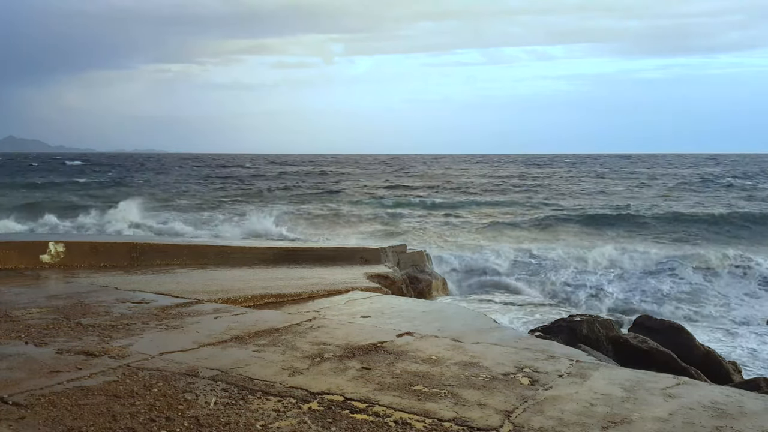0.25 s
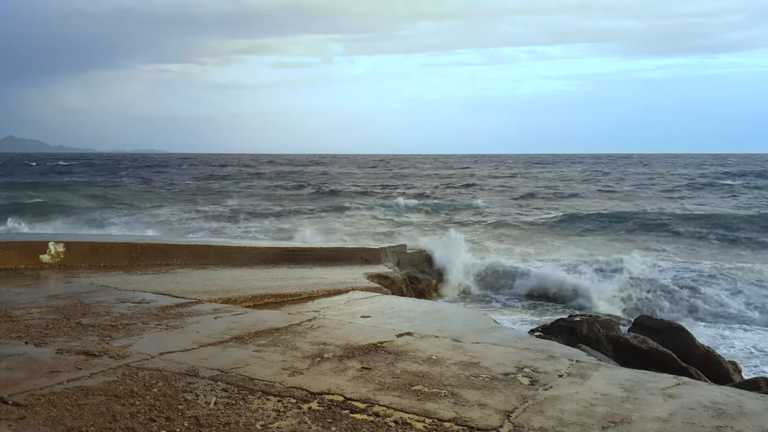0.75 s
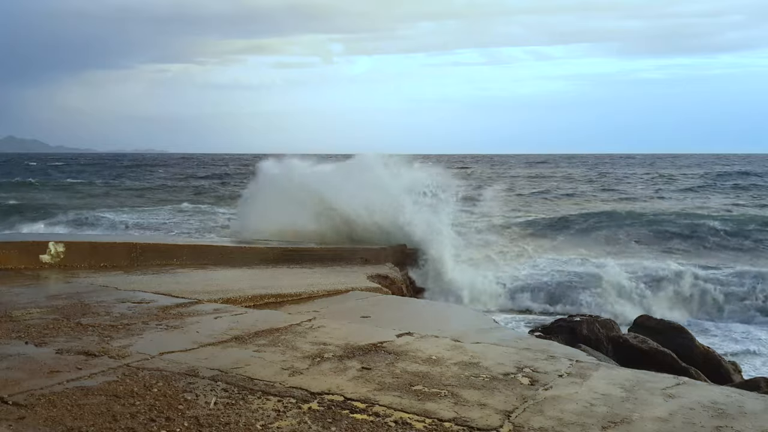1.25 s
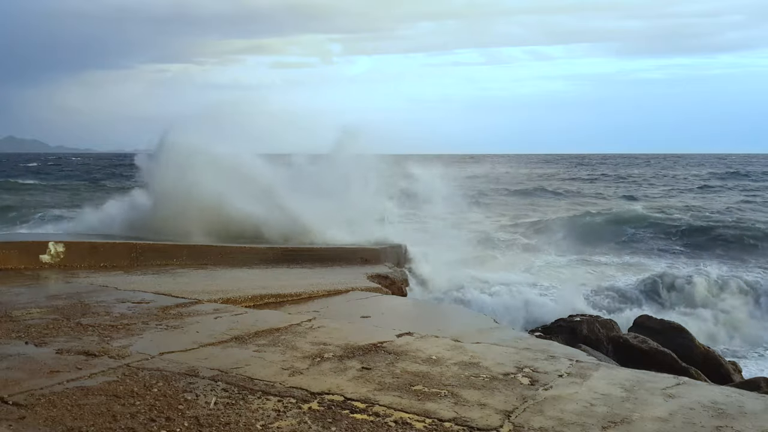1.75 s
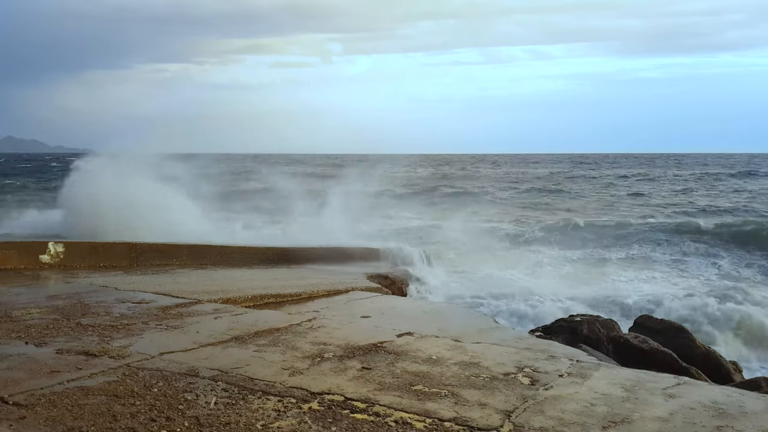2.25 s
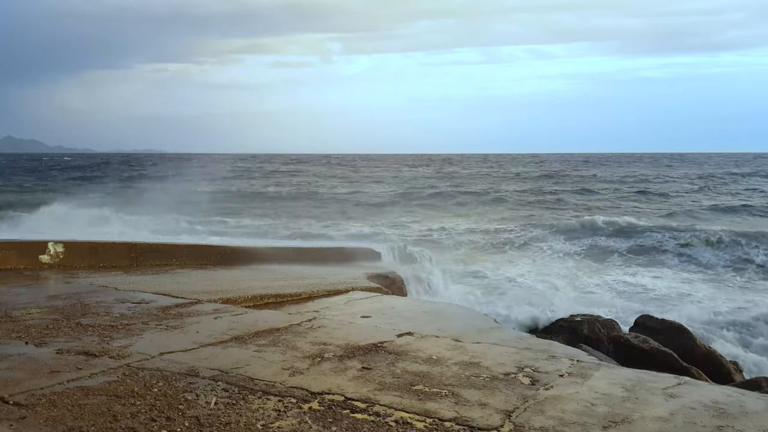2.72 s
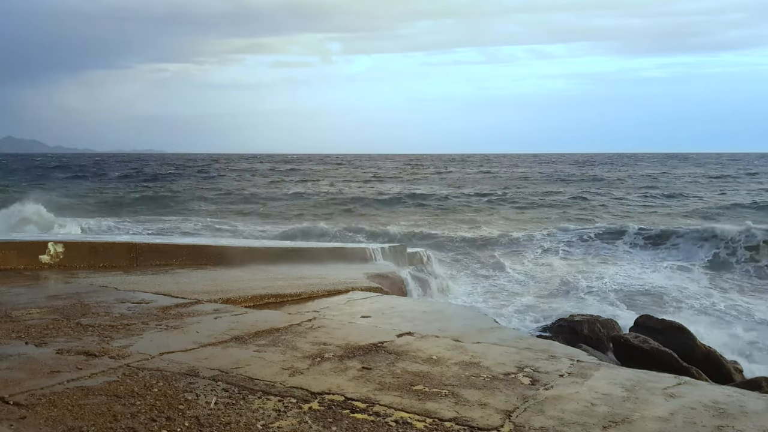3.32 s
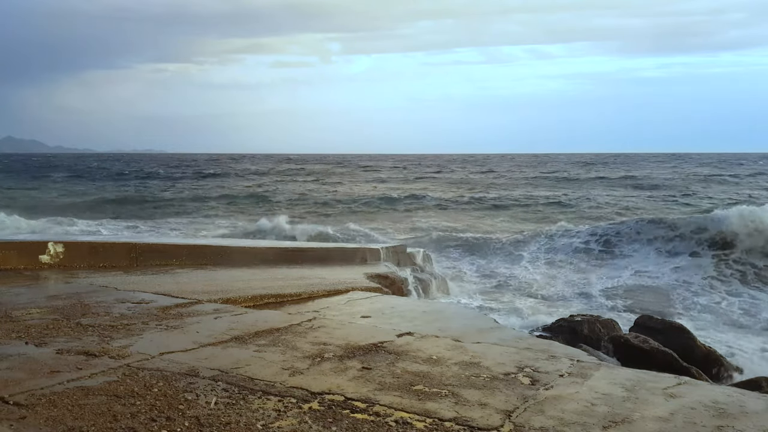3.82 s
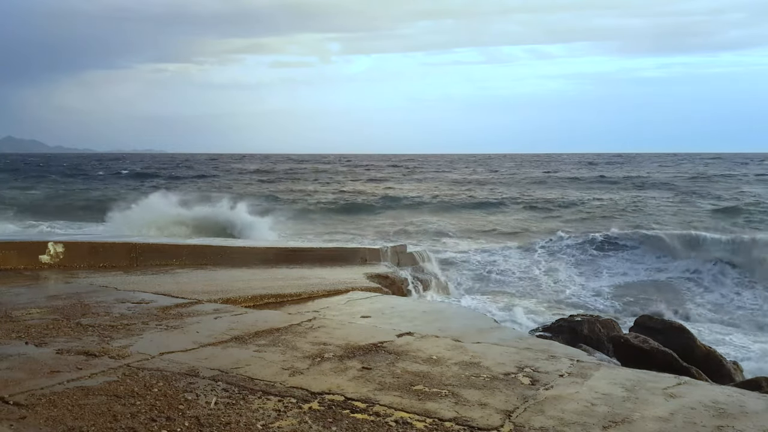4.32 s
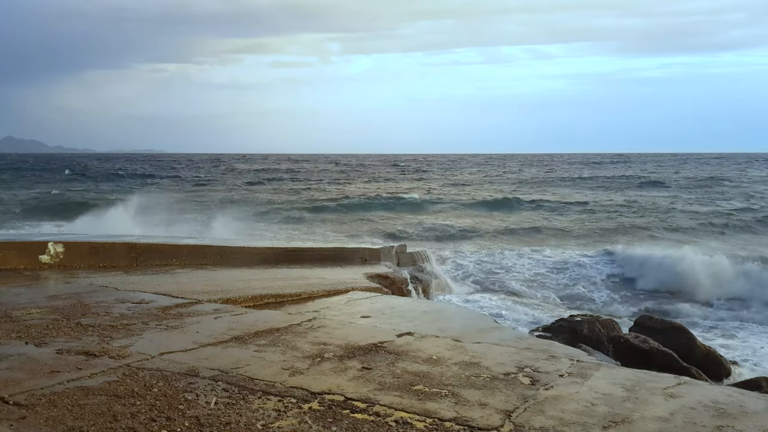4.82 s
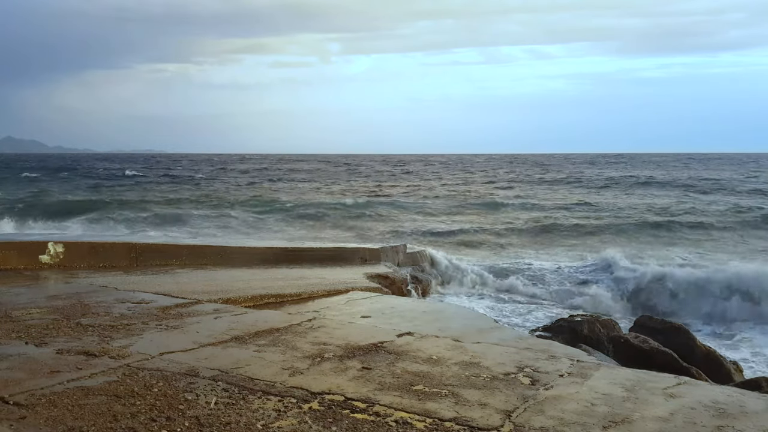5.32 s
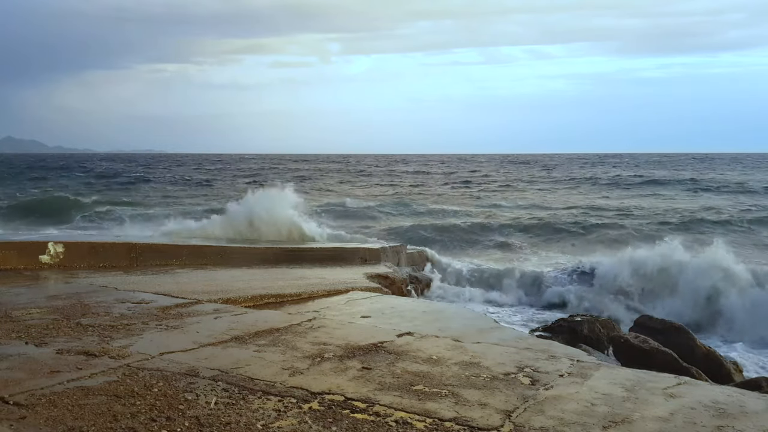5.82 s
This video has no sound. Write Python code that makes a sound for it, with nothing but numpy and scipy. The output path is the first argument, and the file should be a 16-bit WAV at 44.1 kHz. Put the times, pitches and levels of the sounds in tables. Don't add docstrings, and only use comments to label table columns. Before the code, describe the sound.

Close stereo microphones in the wind, facing rough sea at a jetty. Continuous wash and hiss of foam; soft fluttering puffs near the start; a sharp wave burst and low boom; then about a third of a second of loud, rapid, hollow wind knocks on both sides. A quieter lull holds a small pop on the left, followed by rock-breaking waves, a few light puffs and a rising last splash.

```python
import sys
import numpy as np
from scipy import signal
from scipy.fft import rfft, irfft, next_fast_len
from scipy.io import wavfile
from scipy.ndimage import uniform_filter1d, map_coordinates

SR = 44100
rng = np.random.default_rng(int(sys.argv[2]) if len(sys.argv) > 2 else 0)


def invert_db(level):
    return 10 ** (np.asarray(level, dtype=float) / 20)


def generate_wav(signal):
    frames = np.transpose(np.atleast_2d(signal))
    scaled = np.clip(frames, -1, 1) * 32767
    pcm = np.round(scaled).astype(np.int16)
    wavfile.write(sys.argv[1], SR, pcm)


N = 267246

# start_s, surge_db, spray_thrown_db
SEA_SURGE = [(0, -51, -13.5), (.47, -54.5, -14), (.62, -48, -14), (1.1, -46, -12.5), (1.66, -44, -15),
             (1.78, -40, -12), (2.04, -41, -11), (2.16, -38.5, -10.5), (2.5, -42.5, -10.5),
             (2.72, -49.5, -6), (3.3, -50.5, -11), (3.62, -50, -13), (4.24, -42.5, -13.5),
             (4.45, -43.5, -12.5), (4.6, -44, -15.5), (5.21, -39.5, -12), (5.45, -44.5, -14),
             (6.06, -40.5, -11)]
# centre_s, over_surge_db, length_s
SLAPS_AND_LULLS = [(0.59, 2.5, 0.025), (1.127, 4.5, 0.012), (1.09, -1.5, 0.012), (1.676, 2, 0.04),
                   (5.78, -2, 0.061), (1.287, 2, 0.01), (2.118, 2.5, 0.03), (2.683, -5.5, 0.014),
                   (2.994, 1.5, 0.057), (3.064, -4, 0.0082), (3.833, 4, 0.11), (4.01, -4.5, 0.32),
                   (0.253, 1, 0.1), (5.599, 1, 0.014), (5.63, -3.5, 0.031), (5.696, 1.5, 0.017)]
# freq_hz, level_db_per_hz
ROAR_COLOUR = [(60, -66), (250, -36.5), (480, -11), (700, 1), (900, -2), (1150, 3.5), (1400, 0),
               (1700, 2.5), (2600, -32), (5000, -48), (9000, -120)]
# freq_hz, level_db_per_hz
SPLASH_COLOUR = [(300, -56), (900, -11), (1600, -5.5), (2200, -2), (2700, -3.5), (4100, -1.5), (4800, -4.5),
                 (6200, -16.5), (8000, -30), (14000, -120)]
# freq_hz, level_db_per_hz
SPRAY_COLOUR = [(2000, -60), (4500, 4.5), (6000, 0.5), (8300, -8.5), (10500, -2.5), (13000, -6),
                (15700, -13), (20000, -55)]
# freq_hz, share_0_to_1
PORT_LIKENESS = [(250, .3), (550, .78), (900, .5), (1350, .72), (1900, .3), (2200, .5), (2650, .15),
                 (3100, .55), (4000, .25), (5000, .15), (9000, .08), (11500, .22), (15000, .08)]
# freq_hz, lead_rad
PORT_LEAD = [(0, 0), (350, 0), (700, -.9), (1400, -3.1), (1800, -3.9), (2150, -6.2), (3000, -6.5),
             (3600, -7), (4200, -9.2), (5400, -10.5), (7400, -13), (11200, -14), (15500, -22)]
# freq_hz, left_minus_right_db
PORT_BALANCE = [(60, -1), (150, -2), (380, 1), (950, 0.5), (2380, 0.5), (5980, -1.5), (15000, 0)]
# peak_s, peak_db, left_minus_right_db
PRESSURE_LUMPS = [(0, -90, 2), (.39, -73, -11), (.54, -66, -2), (1.06, -91, -5), (1.18, -69, -3),
                  (1.45, -73, -3), (1.75, -66, 0), (2.09, -63, -4), (2.24, -66, 15), (2.4, -63, -10),
                  (2.52, -52.5, 5), (2.9, -83, -18), (3.2, -99, -6), (3.45, -75, -2), (3.88, -72, 3),
                  (4.3, -73, 4), (4.51, -65, -4), (4.691, -85, -1), (4.84, -69, -6), (5.03, -77, -12),
                  (5.15, -74, -1), (5.38, -63, 3), (5.7, -71, -20), (5.9, -76, -10), (6.05, -74, 3)]
# freq_hz, level_db_per_hz
THUMP_COLOUR = [(20, -58), (60, -53), (120, -28.5), (250, -7.5), (400, -6.5), (600, 0), (1000, -3.5),
                (3000, -120)]
# start_s, peak_db, left_minus_right_db, ring_hz
AIR_PUSHES = [(0.176, -44, 10, 500), (0.333, -36.5, 2, 477), (.405, -41, 0, 444), (0.59, -42, 0, 460),
              (1.048, -53, 22, 388), (1.081, -47, 0, 430), (1.604, -46, 3, 490), (1.952, -49, 0.0, 505),
              (2.059, -40, 7, 464), (2.143, -58, 4, 400), (2.18, -71, -13, 490), (2.228, -35, 7, 422),
              (2.273, -38, 10, 420), (2.343, -32, 2, 476), (2.397, -33, 8, 485), (2.606, -42.5, -2, 378),
              (3.064, -54, -18, 482), (3.515, -50, -3, 390), (4.216, -71, -14, 503), (4.578, -49, -5, 437),
              (5.03, -40, 3, 417), (5.56, -46, 7, 510), (5.869, -44, 3.5, 437)]
# peak_s, peak_db, ring_hz, length_ms
LEFT_EDDIES = [(0.3029, -25.5, 1400, 0.7), (0.3084, -27.5, 1340, 0.8), (0.312, -27.5, 970, 1.0),
               (0.3156, -27.5, 1260, 0.6), (0.3372, -18.0, 860, 2.4), (0.34, -23.5, 1120, 1.2),
               (0.4025, -23.0, 840, 1.6), (0.4136, -26.0, 880, 1.0), (0.4186, -28.0, 1160, 0.9),
               (0.4393, -27.5, 910, 1.0), (0.462, -28.0, 1080, 0.9), (4.5785, -26.5, 1180, 1.1),
               (4.5878, -27.0, 1500, 0.6), (4.608, -27.0, 1050, 0.8), (5.421, -26.0, 1440, 0.7),
               (5.4433, -25.0, 1330, 1.6), (5.4828, -22.0, 1350, 0.7), (5.4894, -22.5, 1200, 1.0),
               (5.492, -24.5, 1200, 1.6), (5.5116, -18.5, 1330, 0.7), (5.5152, -24.0, 1040, 1.8),
               (5.5883, -27.0, 1210, 1.1), (5.5919, -23.5, 1260, 0.7), (5.5938, -23.0, 960, 1.4)]
# peak_s, peak_db, ring_hz, length_ms
RIGHT_EDDIES = [(0.3366, -27.0, 890, 3.0), (0.3448, -33.0, 860, 1.7), (0.3468, -29.0, 830, 1.5),
                (0.3533, -31.5, 970, 1.0), (0.3619, -29.5, 870, 1.2), (0.3655, -31.0, 1030, 1.8),
                (0.3688, -31.0, 990, 1.0), (0.3732, -32.0, 840, 1.5), (0.4009, -27.0, 830, 1.5),
                (0.4076, -29.5, 1020, 0.7), (0.4452, -26.0, 790, 2.4), (0.4603, -31.0, 880, 1.3),
                (0.47, -32.5, 1200, 0.8), (0.4803, -34.0, 940, 2.4), (0.5578, -30.0, 980, 0.9),
                (0.5618, -29.5, 960, 1.3), (0.5936, -27.5, 1060, 0.8), (0.5969, -27.0, 1030, 1.4),
                (4.5812, -25.0, 1050, 0.8), (4.5839, -22.0, 970, 1.1), (4.5892, -24.5, 1040, 1.3),
                (5.4433, -23.5, 1400, 1.2), (5.4867, -26.5, 1420, 0.9)]
# peak_s, peak_db, ring_hz, length_ms
LEFT_STRONG_GUST = [(2.2281, -23.0, 1070, 1.4), (2.2308, -11.0, 1150, 0.8), (2.232, -22.5, 1080, 3.9),
                    (2.2445, -13.0, 1100, 0.9), (2.2461, -15.5, 1140, 1.7), (2.2518, -14.0, 1140, 1.1),
                    (2.2575, -19.5, 1040, 1.1), (2.2758, -17.5, 900, 0.9), (2.2867, -16.5, 1710, 0.8),
                    (2.2894, -23.0, 1110, 1.1), (2.2926, -20.5, 1160, 0.8), (2.2962, -16.0, 1000, 1.3),
                    (2.2997, -21.0, 1080, 1.8), (2.3013, -22.5, 1420, 0.6), (2.3037, -23.0, 1310, 0.7),
                    (2.3418, -23.5, 1110, 0.8), (2.3513, -21.0, 840, 1.4), (2.3554, -19.5, 850, 1.5),
                    (2.3585, -13.5, 930, 1.3), (2.3608, -14.0, 980, 2.1), (2.3633, -10.5, 930, 1.1),
                    (2.3705, -6.0, 1130, 0.9), (2.3723, -14.5, 1020, 0.9), (2.3801, -16.5, 1170, 0.8),
                    (2.4029, -15.5, 900, 1.9), (2.4055, -15.5, 1000, 0.8), (2.4091, -21.5, 980, 1.0),
                    (2.411, -21.5, 840, 1.1), (2.4153, -18.0, 1110, 0.8), (2.4177, -19.0, 1050, 1.8),
                    (2.4316, -22.0, 980, 1.5), (2.4488, -15.0, 1090, 1.0), (2.4708, -16.5, 1150, 1.0),
                    (2.4733, -13.0, 940, 2.0), (2.4763, -16.5, 1070, 0.9), (2.4791, -15.5, 1240, 1.0),
                    (2.4806, -15.0, 1100, 0.9), (2.4993, -9.5, 1020, 0.9), (2.503, -16.0, 830, 2.1),
                    (2.5074, -14.5, 890, 1.3), (2.5115, -19.5, 980, 1.0), (2.5182, -20.5, 1070, 0.9),
                    (2.5277, -16.0, 940, 1.1), (2.5308, -13.5, 930, 1.4), (2.5316, -17.0, 890, 3.3),
                    (2.5358, -14.5, 1060, 1.6), (2.5381, -22.5, 1280, 1.3), (2.5567, -23.0, 1040, 1.3),
                    (2.5591, -19.5, 1090, 0.9), (2.5613, -23.0, 1020, 1.1)]
# peak_s, peak_db, ring_hz, length_ms
RIGHT_STRONG_GUST = [(2.2323, -22.0, 1100, 0.6), (2.2435, -22.5, 1320, 0.6), (2.2454, -10.5, 1020, 2.1),
                     (2.2854, -22.0, 1250, 0.7), (2.292, -23.0, 1640, 0.6), (2.3449, -18.5, 1050, 1.0),
                     (2.3489, -18.5, 940, 1.4), (2.3526, -18.0, 960, 1.4), (2.3577, -8.0, 950, 1.8),
                     (2.3602, -16.5, 1190, 1.0), (2.362, -19.0, 1260, 0.9), (2.3639, -12.0, 1030, 1.4),
                     (2.366, -17.0, 910, 1.2), (2.3689, -14.5, 1180, 0.8), (2.3768, -19.0, 1220, 0.7),
                     (2.3839, -20.0, 950, 3.0), (2.3967, -22.0, 1200, 0.7), (2.4009, -19.0, 930, 4.9),
                     (2.402, -13.0, 880, 2.6), (2.4054, -15.0, 900, 1.4), (2.4087, -17.5, 910, 1.0),
                     (2.417, -14.5, 980, 1.0), (2.4294, -19.0, 960, 1.2), (2.4332, -12.5, 1120, 0.9),
                     (2.4423, -22.5, 1080, 0.6), (2.4504, -22.0, 1460, 0.7), (2.4544, -20.0, 1410, 0.6),
                     (2.4635, -21.0, 1170, 0.9), (2.4715, -14.5, 960, 2.0), (2.4766, -21.0, 990, 1.8),
                     (2.4797, -20.5, 880, 1.7), (2.4819, -17.0, 1260, 1.2), (2.4848, -22.0, 1200, 1.6),
                     (2.4944, -20.0, 1070, 0.9), (2.4975, -17.0, 1030, 2.0), (2.4993, -10.0, 1000, 0.9),
                     (2.5029, -14.5, 1040, 0.8), (2.508, -16.0, 1090, 1.8), (2.5105, -13.5, 980, 1.5),
                     (2.5135, -16.5, 1240, 0.8), (2.5169, -21.5, 1040, 1.1), (2.5267, -20.0, 840, 1.7),
                     (2.5303, -12.0, 1090, 1.2), (2.5335, -10.0, 990, 1.1), (2.5354, -18.0, 950, 1.5),
                     (2.5379, -13.5, 1040, 1.7), (2.5416, -21.5, 990, 1.3), (2.5432, -21.0, 960, 0.9),
                     (2.5455, -22.0, 840, 1.9), (2.5544, -21.5, 910, 1.9)]
# from_s, to_s
SIDE_AIR = [
    (.33, .35),
    (2.24, 2.25),
    (5.44, 5.447),
]
# freq_hz, level_db_per_hz
WAKE_COLOUR = [(60, -69), (250, -36), (420, -3), (560, -6), (700, 27.5), (900, -14), (1400, 8), (2300, -44),
               (4400, -30), (9000, -86)]
# freq_hz, level_db_per_hz
CRACK_COLOUR = [(300, -2), (1200, -27), (1600, 14), (2500, -3), (4000, -11), (9000, -60)]
# start_s, length_s, level_db, left_minus_right_db
FLUTTER_GUSTS = [(0.304, .18, -41.5, 3), (0.506, 0.068, -39.5, 1.5), (2.222, 0.1, -35.5, 4),
                 (2.344, 0.049, -32, -3), (2.397, 0.05, -32, -3), (2.444, 0.017, -34, 1),
                 (2.464, 0.02, -30.5, -5), (2.491, 0.078, -33, -3), (0.99, 0.32, -48, 1),
                 (4.34, 0.344, -46.5, -1.5), (5.448, 0.19, -46, -4), (5.85, .3, -47.5, 8)]
# freq_hz, level_db_per_hz
STREAM_COLOUR = [(60, -104), (300, -23), (550, -11), (760, -2), (1000, -7), (1500, -13), (2500, -20),
                 (6000, -90)]
# peak_s, peak_db, rise_s_per_10db, fall_s_per_10db
JETTY_BURSTS = [
    (1.4, -42.5, 1.07, 0.47),
    (1.79, -33.5, 0.075, 0.3),
    (1.93, -39.5, 0.4, 0.73),
    (5.08, -43, .13, 0.53),
]
# freq_hz, level_db_per_hz
BURST_COLOUR = [(400, -60), (800, -11), (1300, -11), (1550, -2), (2250, 1), (2700, -20), (3400, -9.5),
                (4550, -6.5), (4950, -15), (7000, -24), (12000, -34), (16000, -60)]
# peak_s, peak_db, rise_s_per_10db, fall_s_per_10db
WALL_BOOMS = [
    (1.15, -47.5, .25, 0.53),
    (1.55, -52, 0.51, 0.91),
    (1.95, -43, 0.88, .3),
]
# freq_hz, level_db_per_hz
BOOM_COLOUR = [(200, -59), (450, -10), (650, 0), (850, -3), (1100, 1.5), (1400, -11), (2200, -40),
               (6000, -120)]
# peak_s, peak_db, left_minus_right_db, ring_hz, push_or_suck_sign
AIR_POPS = [
    (3.4597, -22, 21, 950, 1),
    (3.4667, -28, 20, 950, -1),
    (3.4778, -27, 18, 1150, -1),
]
# peak_s, peak_db, rise_s_per_10db, fall_s_per_10db
ROCK_BREAKERS = [
    (4.3, -36.5, 0.45, .5),
    (5.15, -62, 0.54, .4),
    (6.06, -37.5, 0.11, .3),
]
# freq_hz, level_db_per_hz
ROCK_COLOUR = [(60, -120), (300, -45), (500, -17), (750, -1), (1200, 0), (1700, -3), (2150, 1),
               (2500, -1.5), (3000, -2), (4000, 0), (5500, -13.5), (11000, -35.5), (16000, -34)]
# centre_hz, width_hz, gain_db
PORT_RESONANCES = [(2150, 150, 1.6), (2650, 150, -1.8), (4550, 170, 1.8), (5700, 500, -1.2)]

TIME_S = np.arange(N) / SR


def unit(x):
    return x / np.sqrt(np.mean(x ** 2) + 1e-20)


def along(points, hz):
    point_hz, value = np.transpose(points)
    return np.interp(np.log(hz + 1), np.log(point_hz + 1), value)


def curves(rows):
    row_s, *columns = np.transpose(rows)
    return [np.interp(TIME_S, row_s, column) for column in columns]


def wobble(rate_hz):
    knots = rng.standard_normal(400)
    return map_coordinates(knots, [np.arange(N) * np.clip(rate_hz, .1, 60) / SR])


def filtered(x, response):
    size = next_fast_len(N + 8192)
    hz = np.fft.rfftfreq(size, 1 / SR)
    return irfft(rfft(x, size) * response(hz), size)[..., :N]


def coloured(x, colour):
    return filtered(x, lambda hz: invert_db(along(colour, hz)))


def lag(x, seconds):
    keep = np.exp(-1 / (seconds * SR))
    return signal.lfilter([1 - keep], [1, -keep], x)


def balance(pan_db):
    return invert_db(pan_db * np.array([[.5], [-.5]]))


def peaks_db(peak_s, db, rise_s, fall_s):
    t = TIME_S - peak_s
    return db - 10 * np.where(t < 0, -t / rise_s, t / fall_s)


def wave_swell(waves):
    return np.sqrt(sum(invert_db(2 * peaks_db(*wave)) for wave in waves))


def patchy_noise(patchy_db):
    z = signal.stft(rng.standard_normal((2, N)), nperseg=512)[2]
    field = uniform_filter1d(rng.standard_normal(z.shape[1:]), size=3, axis=0)
    field = uniform_filter1d(field, size=8, axis=1)
    return unit(signal.istft(z * invert_db(patchy_db * unit(field)), nperseg=512)[1][:, :N])


def bubbles(count, centre_hz, spread, cycles, scatter_db):
    when = rng.random(count)
    pitch = np.clip(rng.standard_normal(count), -2, 2)
    size = np.minimum(rng.exponential(1, count), 2.5)
    hz = centre_hz * np.exp(spread * pitch)[:, None]
    step = np.arange(300)
    turns = hz * step / SR
    life = turns / cycles
    rising_turns = turns * (1 + 0.155 * np.minimum(life, 1))
    tone = np.sin(2 * np.pi * rising_turns) * life * np.exp(-3 * life)
    tone *= invert_db(scatter_db * size)[:, None]
    place = (when * 2 * N).astype(int)[:, None] + step
    swarm = np.bincount(place.ravel(), tone.ravel(), 2 * N + 300)
    return unit(swarm[:2 * N].reshape(2, N))


def at_ports(pair, colour):
    def mix(hz):
        turn = np.arccos(np.clip(along(PORT_LIKENESS, hz), 0, 1)) / 2
        return invert_db(along(colour, hz)) * [np.cos(turn), np.sin(turn)]

    def tilt(hz):
        lead = np.exp(.5j * np.interp(hz, *np.transpose(PORT_LEAD)))
        half = invert_db(along(PORT_BALANCE, hz) / 2) * lead
        return [half, 1 / half]

    same, apart = filtered(pair, mix)
    return unit(filtered(np.array([same + apart, same - apart]), tilt))


def sea():
    surge_db, thrown_db = curves(SEA_SURGE)
    slap_db = sum(db * np.exp(-((TIME_S - s) / length_s) ** 2) for s, db, length_s in SLAPS_AND_LULLS)
    edge_s = 0.19
    hidden = .5 * (np.tanh((TIME_S - 0.89) / edge_s) - np.tanh((TIME_S - 2.34) / edge_s))
    mean_db = surge_db.mean()
    roar_db = mean_db + 0.9 * (surge_db - mean_db) + slap_db + 6 - 3 * hidden
    churn_db = .4 * wobble(10) + .55 * wobble(20)

    pockets = patchy_noise(patchy_db=2.0)
    pockets = pockets + invert_db(-14.0) * bubbles(3000, centre_hz=918.4, spread=0.391, cycles=5.9, scatter_db=0.0)
    roar = invert_db(roar_db + churn_db + 0.074 * wobble(27)) * at_ports(pockets, ROAR_COLOUR)

    foam = patchy_noise(patchy_db=2.5)
    foam = foam + invert_db(-9) * bubbles(6000, centre_hz=3100, spread=0.3996, cycles=16.2, scatter_db=1.5)
    splash_db = surge_db + slap_db + 3.5 + churn_db + 0.11 * wobble(1.51)
    splash = invert_db(splash_db) * at_ports(foam, SPLASH_COLOUR)

    mist = patchy_noise(patchy_db=1.6)
    spray_db = surge_db + thrown_db + .9 * slap_db + 5 + .6 * churn_db + .35 * wobble(14)
    spray = invert_db(spray_db) * at_ports(mist, SPRAY_COLOUR)
    return roar + splash + spray


def thumps():
    rise_s, fall_s, calm_db = 0.087, 0.078, -72
    swell = sum(invert_db(peaks_db(s, db, rise_s, fall_s)) * balance(pan_db) for s, db, pan_db in PRESSURE_LUMPS)
    lumps = invert_db(5.2 * np.array([wobble(25.09), wobble(25)]))
    noise = coloured(lumps * rng.standard_normal((2, N)), THUMP_COLOUR)
    return invert_db(8.5) * (swell + invert_db(calm_db)) * unit(noise)


def thuds():
    out = np.zeros((2, N + 800))
    t = np.arange(800) / SR
    soft = np.exp(-((t - .008) / .003) ** 2)
    for (s, db, pan_db, hz), phase in zip(AIR_PUSHES, rng.random(len(AIR_PUSHES))):
        push = soft * np.sin(2 * np.pi * (hz * t + phase))
        start = round((s - .003) * SR)
        out[:, start:][:, :len(t)] += invert_db(db - 2.0) * balance(pan_db) * push
    return filtered(out[:, :N], lambda hz: 1 / (1 + (200 / (hz + 1)) ** 4))


def puffs(eddies, sucked=()):
    pitch_sag, length_stretch = 0.95, 0.99
    ring_db, wake_db, crack_db = -1, -7.5, -16
    rings, swell = np.zeros(N), np.zeros(N)
    t = np.arange(-400, 400) / SR
    for (s, db, hz, ms), phase in zip(eddies, rng.standard_normal(len(eddies))):
        span = slice(round(s * SR) - 400, round(s * SR) + 400)
        width_s = length_stretch * max(ms, .4) * 0.00084
        shape = invert_db(db) * np.exp(-2 * (t / width_s) ** 2)
        way = -1 if any(start < s < end for start, end in sucked) else 1
        turns = pitch_sag * hz * t + 870 * s + .7 * np.sin(45 * s) + .1 * phase
        rings[span] += way * shape * np.sin(2 * np.pi * turns)
        swell[span] += shape
    air = unit(coloured(rng.standard_normal(N), WAKE_COLOUR))
    turbulence = unit(coloured(rng.standard_normal(N), CRACK_COLOUR))
    wake = invert_db(wake_db) * lag(swell, 0.0034) * air
    crack = invert_db(crack_db) * swell * turbulence
    return filtered(invert_db(ring_db) * rings + wake + crack, lambda hz: 1 / (1 + (480 / (hz + 1)) ** 6))


def ducked(water, wind):
    over = lag(wind ** 2, 0.022) / np.abs(uniform_filter1d(water ** 2, size=8000))
    low = filtered(water, lambda hz: 1 / (1 + (hz / 2100) ** 6))
    return water - low * (1 - (1 + 2.5 * over) ** -.4)


def flutter():
    edge_s = 0.004
    gate = lambda s: .5 + .5 * np.tanh((TIME_S - s) / edge_s)
    swell = sum(invert_db(db) * balance(pan_db) * (gate(s) - gate(s + length_s))
                for s, length_s, db, pan_db in FLUTTER_GUSTS)
    uneven = invert_db(3.9 * np.array([wobble(50), wobble(50)]))
    return swell * unit(coloured(uneven * rng.standard_normal((2, N)), STREAM_COLOUR))


def breaker():
    same, apart = coloured(patchy_noise(patchy_db=2.2), BURST_COLOUR)
    burst = unit(np.array([same + 0.68 * apart, same - 0.51 * apart]))
    return wave_swell(JETTY_BURSTS) * invert_db(0.25 * wobble(4.1)) * burst


def jetty_boom():
    same, apart = coloured(patchy_noise(patchy_db=2.0), BOOM_COLOUR)
    return wave_swell(WALL_BOOMS) * unit(np.array([same + 0.12 * apart, same - 0.32 * apart]))


def pops():
    rise_ms, fall_ms = .3, 1.0
    out = np.zeros((2, N))
    t = np.arange(-100, 100) / SR
    shape = np.exp(-np.abs(1e3 * t / np.where(t < 0, rise_ms, fall_ms)) ** 1.3)
    spike = 1.3 * np.exp(-(t / 9e-5) ** 2)
    for s, db, pan_db, hz, way in AIR_POPS:
        cycle = np.sign(way) * shape * (np.cos(2 * np.pi * hz * t) + spike) / 1.9
        near = invert_db(db + 8.0) / (invert_db(pan_db / 2) + invert_db(-pan_db / 2))
        out[:, round(s * SR) - 100:round(s * SR) + 100] += near * balance(pan_db) * cycle
    return filtered(out, lambda hz: 1 / (1 + (430 / (hz + 1)) ** 7))


def rock_waves():
    wash = at_ports(patchy_noise(patchy_db=4.5), ROCK_COLOUR)
    return wave_swell(ROCK_BREAKERS) * invert_db(0.9 * wobble(6.1)) * wash


def scene():
    left = puffs(LEFT_EDDIES + LEFT_STRONG_GUST)
    right = puffs(RIGHT_EDDIES + RIGHT_STRONG_GUST, SIDE_AIR)
    gusts = np.array([left, right])
    gusts = gusts + .08 * gusts[::-1] + pops()
    water = sea() + breaker() + jetty_boom() + rock_waves()
    return ducked(water, gusts) + gusts + flutter() + thumps() + thuds()


def low_pass(x):
    return signal.sosfilt(signal.butter(12, 15745, fs=SR, output="sos"), x)


def record(dry):
    def port_gain(hz):
        return invert_db(sum(db * np.exp(-((hz - centre_hz) / width_hz) ** 2)
                       for centre_hz, width_hz, db in PORT_RESONANCES))

    return low_pass(filtered(dry, port_gain))


dry = scene()
out = record(dry)
generate_wav(out)
```